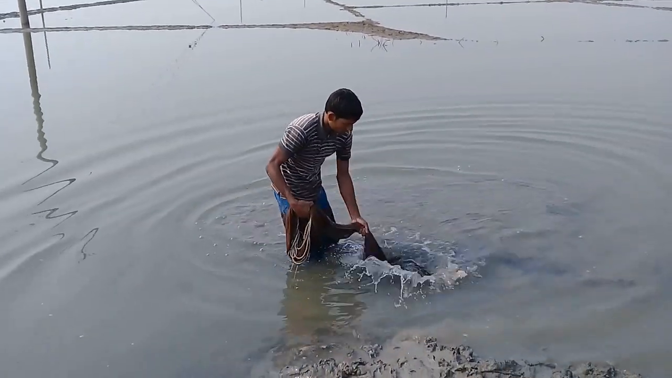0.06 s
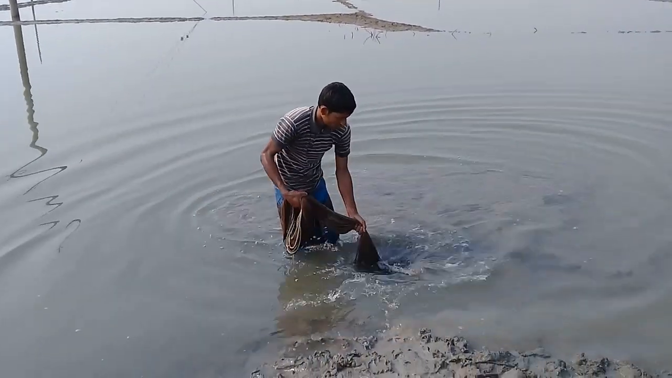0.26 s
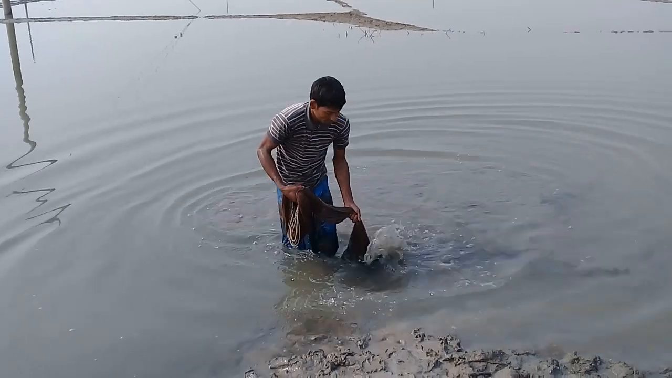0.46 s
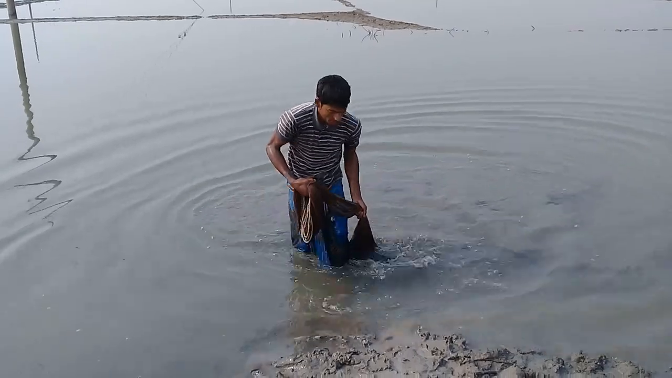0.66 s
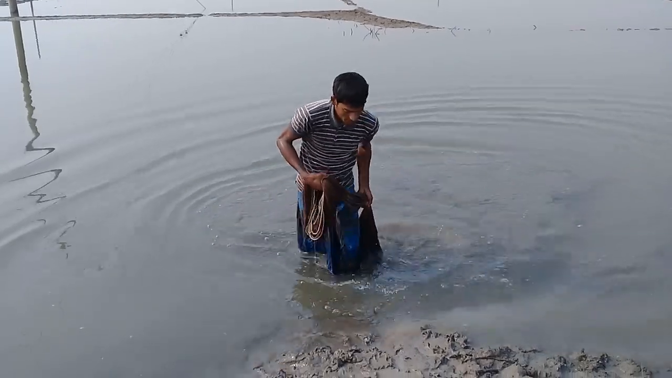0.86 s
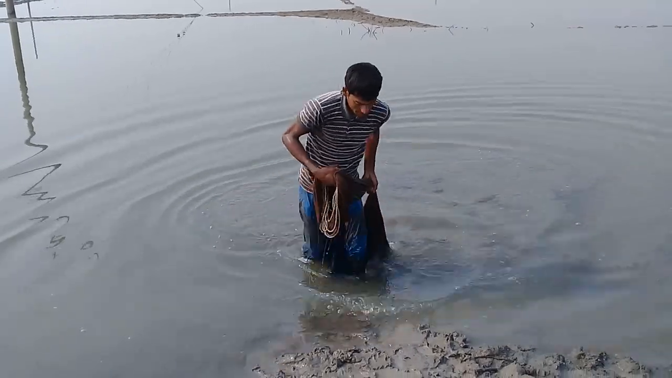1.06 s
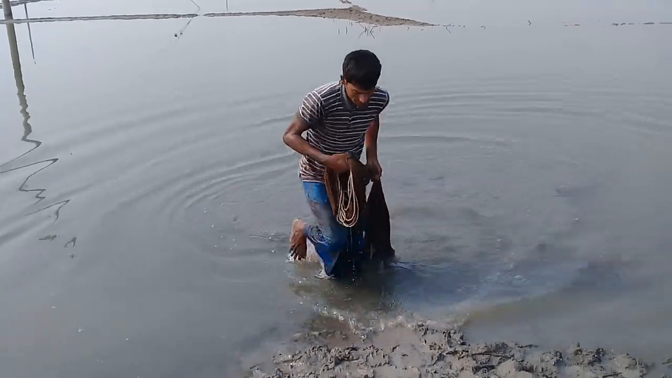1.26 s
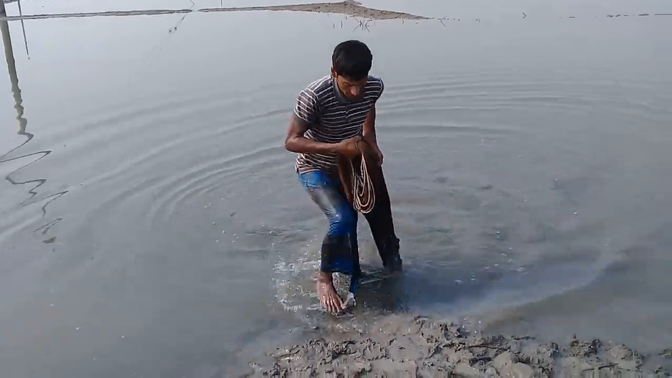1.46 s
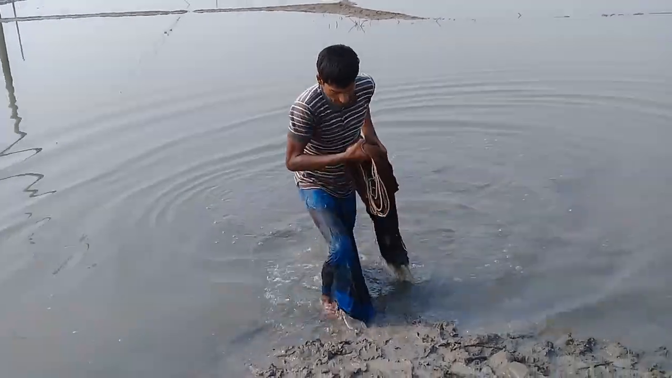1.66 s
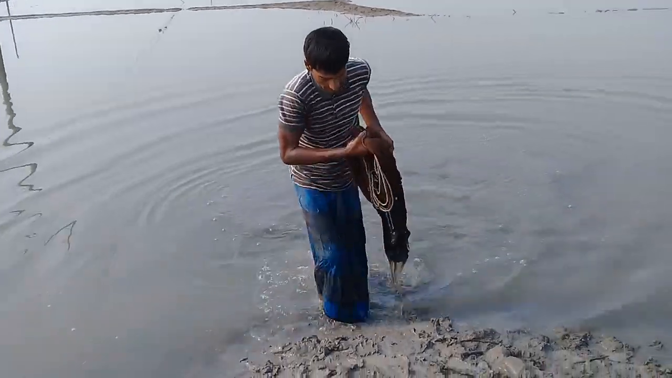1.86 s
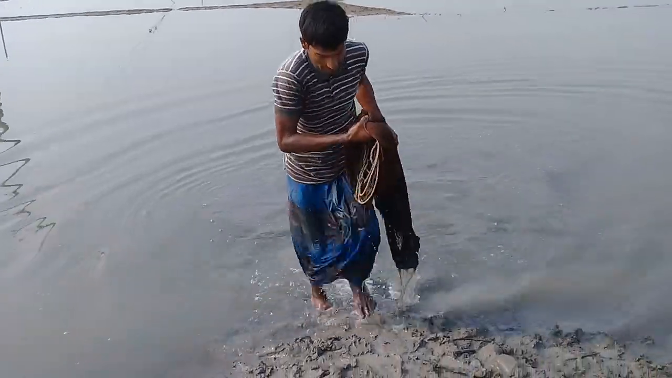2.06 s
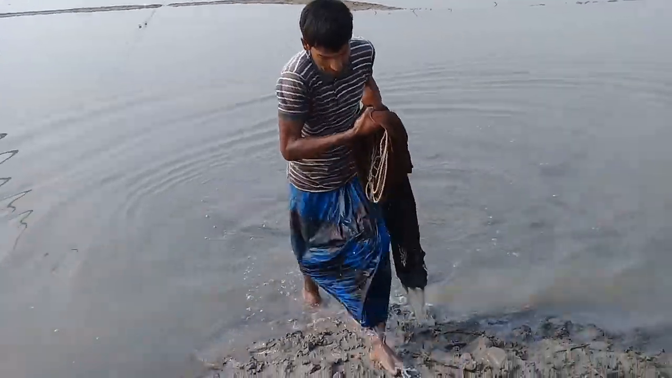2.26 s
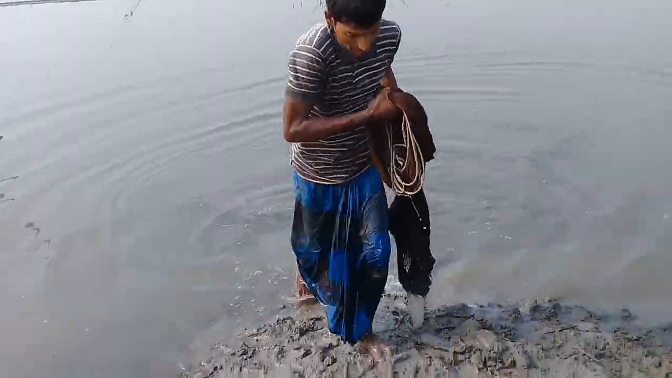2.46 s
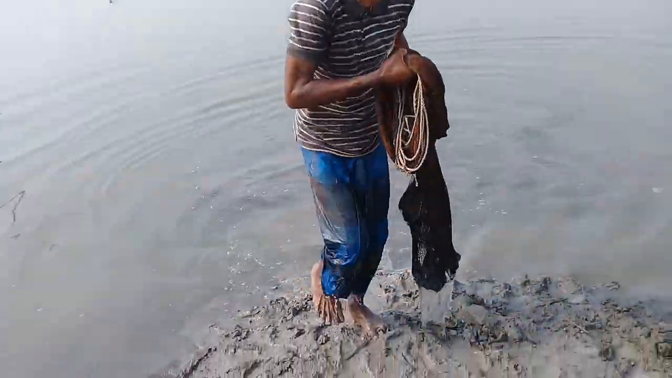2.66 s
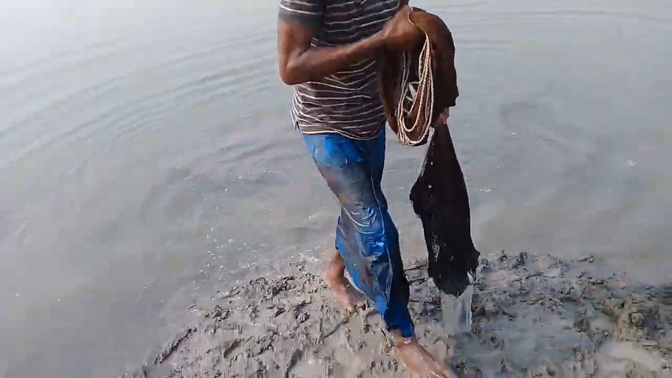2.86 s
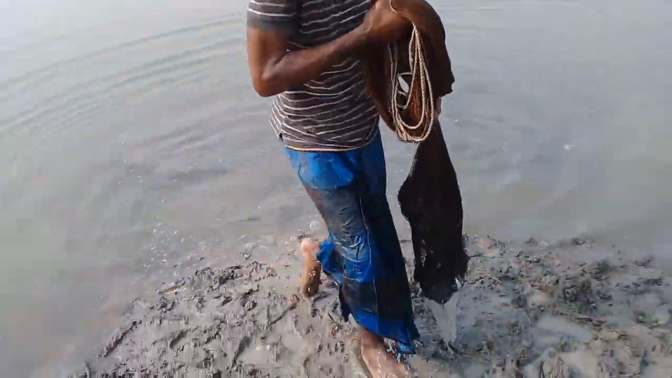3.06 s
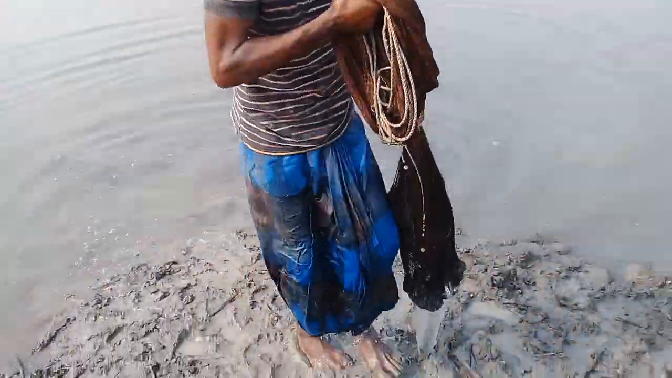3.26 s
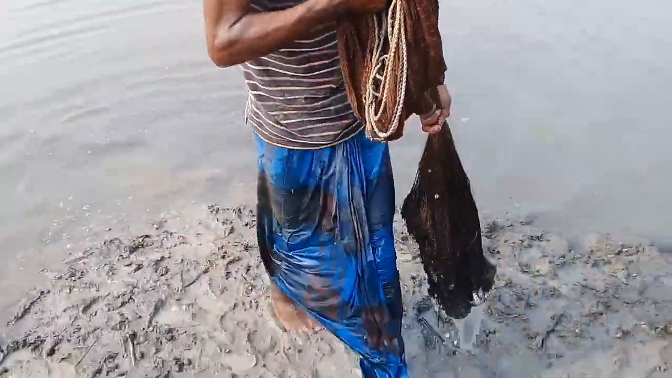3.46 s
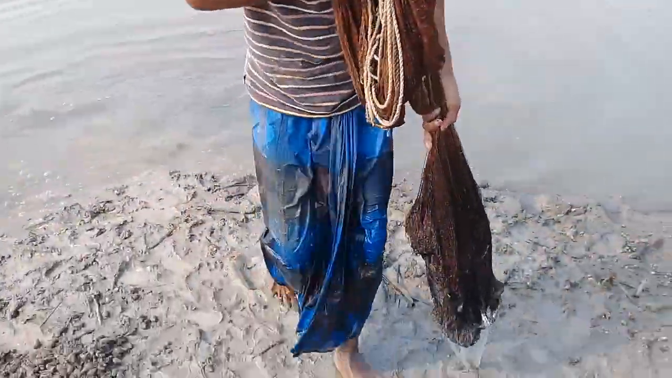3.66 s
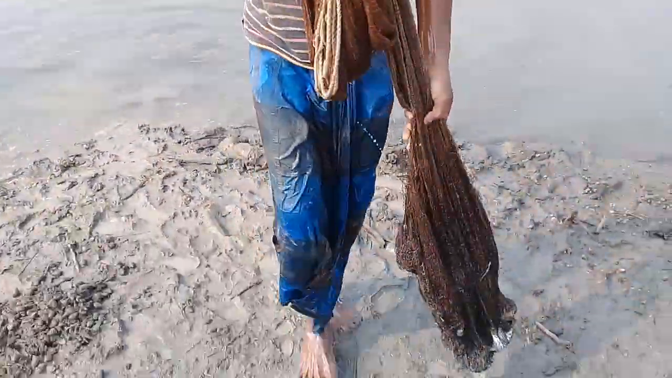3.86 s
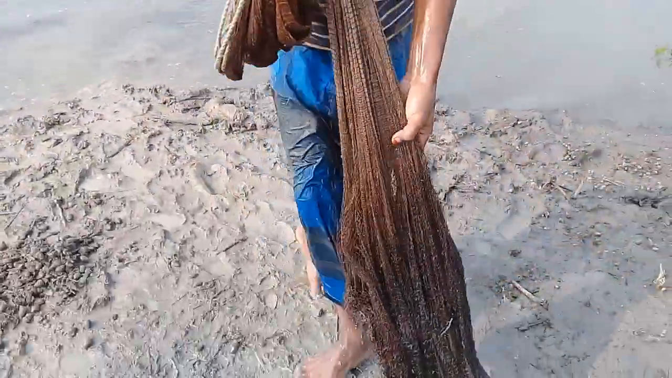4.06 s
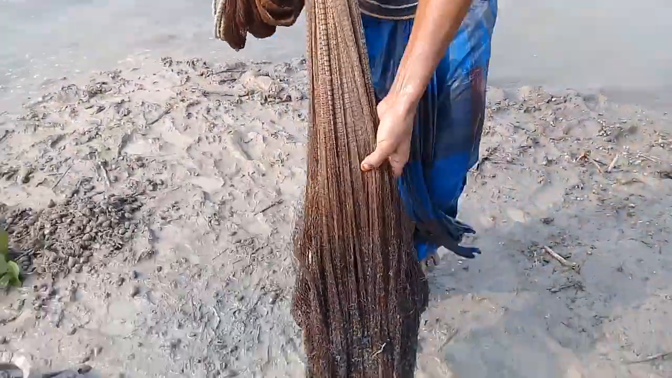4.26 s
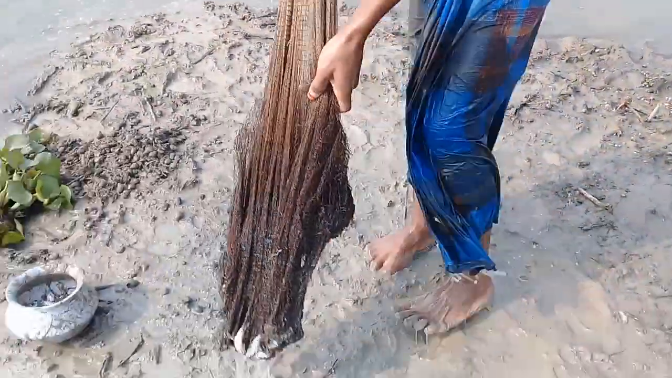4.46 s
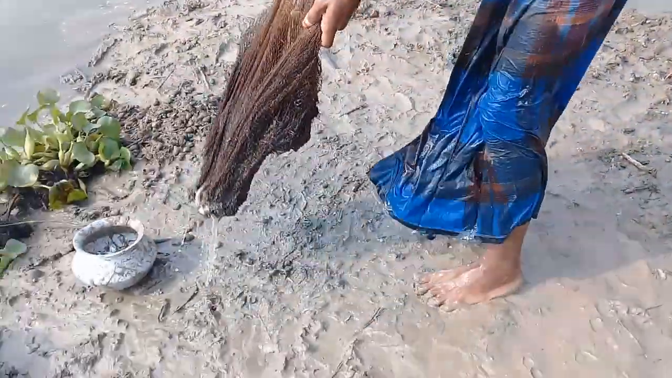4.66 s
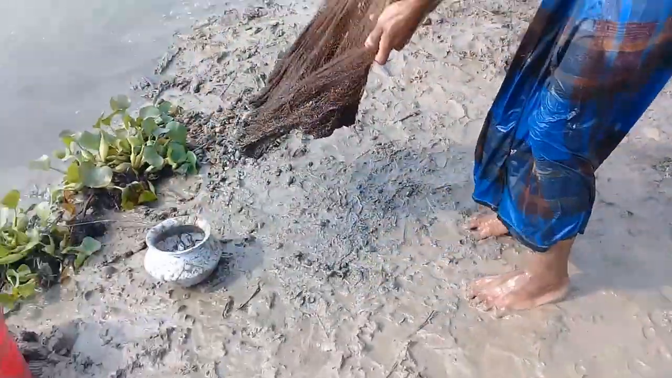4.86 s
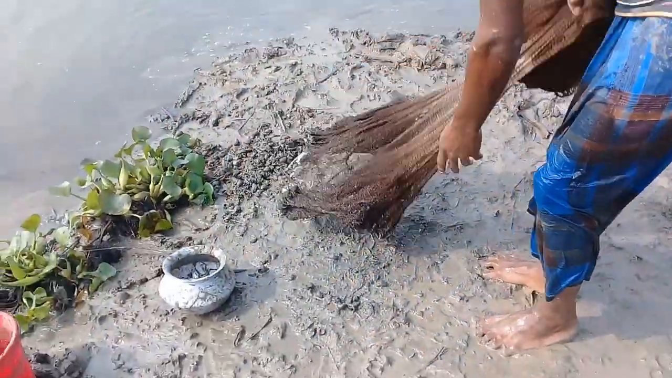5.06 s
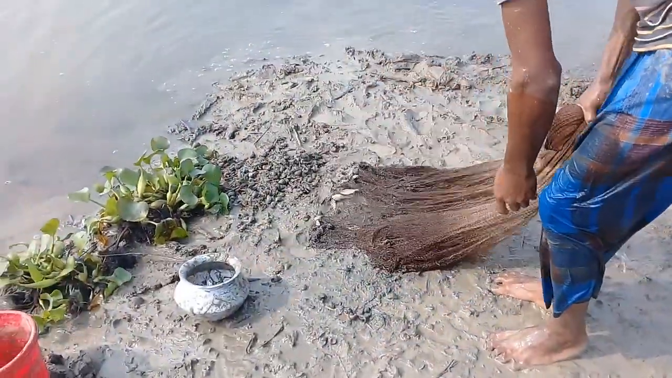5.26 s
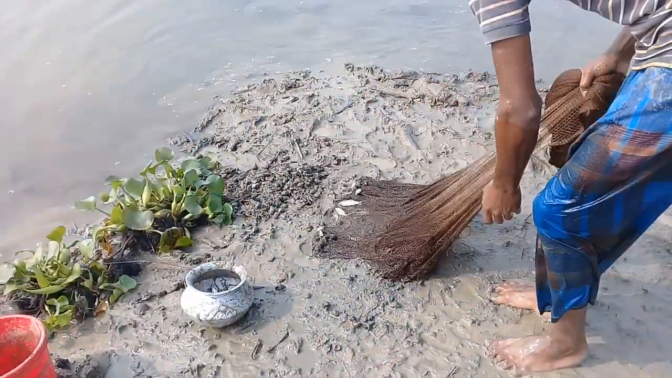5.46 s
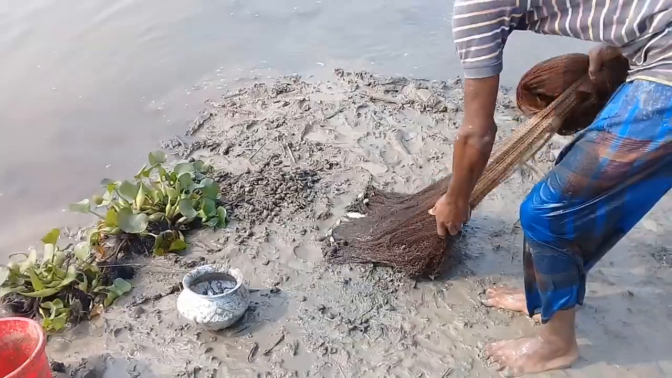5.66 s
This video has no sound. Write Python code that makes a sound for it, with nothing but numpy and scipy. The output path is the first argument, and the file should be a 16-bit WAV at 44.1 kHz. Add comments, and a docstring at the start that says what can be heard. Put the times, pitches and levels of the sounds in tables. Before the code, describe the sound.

Splashes and sloshing steps in shallow water, then a dripping net pattering on mud and a loud wet slap, over distant engine thudding.

```python
"""A fisherman wades out of a shallow river with a dripping cast net, crosses the mud and slaps the net down.
First come splashes, plops and sloshing round his legs, made of random clicks and short rising tones.
Run-off, made of tiny ticks and pings, patters on the river, then on the bank, among fat drops and mud smacks.
Last the strands swish and the heap lands, both made of filtered random clicks.
Two far diesel engines thud throughout; faint crickets, falling whistles, chirp for the first three seconds."""
import sys
import numpy as np
from scipy import signal
from scipy.fft import rfft, irfft, next_fast_len
from scipy.io import wavfile
from scipy.ndimage import map_coordinates

SR = 44100
rng = np.random.default_rng(int(sys.argv[2]) if len(sys.argv) > 2 else 0)


def output_pcm(signal):
    """Save a mono or channel-first signal as 16-bit PCM at the path in sys.argv[1].

    Samples are clipped to [-1, 1] before scaling.
    """
    pcm = np.clip(np.atleast_2d(signal).T, -1, 1) * 32767
    wavfile.write(sys.argv[1], SR, np.round(pcm).astype(np.int16))


N = 251797
TIME = np.arange(N) / SR
BRIEF = np.arange(SR // 8) / SR  # time axis of one short sound
TOP_HZ = 15750  # nothing is kept from this pitch upward
# how far the net is from the microphone: (time [s], distance [m])
NET_DISTANCE = [(1.3, 4.5), (2.7, 3.1), (4.0, 1.48)]


def amp(db):
    """Decibels to gain."""
    return 10 ** (np.asarray(db) / 20)


def unit(x):
    """Scale to an rms (average strength) of 1."""
    return x / np.sqrt(np.mean(x ** 2) + 1e-20)


def curves(rows):
    """One value per sample for each column after the time."""
    s, *cols = np.transpose(rows)
    return [np.interp(TIME, s, c) for c in cols]


def wobble(rate):
    """A smooth random curve through `rate` random points a second."""
    points = rng.standard_normal(int(N * rate / SR) + 4)
    return map_coordinates(points, [TIME * rate])


def swell(s, db, rise, t60, hold=0):
    """A gain that climbs until time s, holds, and dies away by 60 dB in t60 seconds."""
    climb = np.minimum((TIME - s) / rise, 0)
    decay = np.log(1000) * (s + hold - TIME) / t60
    return amp(db) * np.exp(np.minimum(climb, decay))


def together(gains):
    """Unrelated sounds add in power."""
    return np.sqrt(sum(gain ** 2 for gain in gains))


def add(track, s, sound):
    """Mix a sound into the track at time s."""
    start = max(round(s * SR), 0)
    part = track[start:start + len(sound)]
    part += sound[:len(part)]


def coloured(x, spectrum):
    """Shape the tone by (pitch [Hz], relative level [dB]) points, keeping the power of white noise."""
    size = 2 * next_fast_len(len(x) // 2 + 8192)
    hz, db = np.transpose(spectrum)
    log_pitch = np.log(np.fft.rfftfreq(size, 1 / SR) + 1)
    gain = unit(amp(np.interp(log_pitch, np.log(hz), db)))
    # folding the cepstrum makes the filter respond only after each sound, never before it
    cepstrum = irfft(np.log(gain + 1e-6))
    cepstrum[1:size // 2] *= 2
    cepstrum[size // 2 + 1:] = 0
    return irfft(rfft(x, size) * np.exp(rfft(cepstrum)))[:len(x)]


def burst(t60):
    """A short dying puff of noise."""
    return rng.standard_normal(len(BRIEF)) * np.exp(-np.log(1000) * BRIEF / t60)


def impacts(rate, spread_db):
    """Random clicks of uneven size, about `rate` a second, rms 1."""
    hit = rng.random(N) < rate / SR
    size = amp(spread_db * np.clip(rng.standard_normal(N), -2, 2))
    return unit(hit * size * rng.choice([-1, 1], N))


def bubble(hz, t60, rise, attack):
    """A pocket of air rings, its pitch climbing by the share `rise` in t60 seconds."""
    t = BRIEF[:int(t60 * SR) + 2]
    pitch = hz * (1 + rise * t / t60)
    tone = np.sin(2 * np.pi * np.cumsum(pitch) / SR)
    return tone * np.exp(-np.log(1000) * t / t60) * (1 - np.exp(-t / attack))


def bubbles(count, centre_hz, spread, cycles, rise, spread_db):
    """A swarm of bubbles at random moments round a steady or moving pitch, rms 1; high ones die sooner."""
    swarm = np.zeros(N)
    centre = centre_hz * np.ones(N)
    moments = (np.arange(count) + 2 * rng.random(count)) * N / SR / (count + 1)
    chances = 2 * (rng.random((count, 3)) - rng.random((count, 3)))
    for s, (pitch, life, size) in zip(moments, chances):
        hz = centre[int(s * SR)] * np.exp(spread * pitch)
        t60 = cycles * 2 ** (life / 2) / hz
        add(swarm, s, amp(spread_db * size) * bubble(hz, t60, rise, attack=1 / hz))
    return unit(swarm)


def droplets(count, t60, spread_db):
    """Scattered tiny ticks, each with a pitch, life and size of its own, rms 1."""
    chance = rng.random((count, 4))
    t = BRIEF[:SR // 200]
    start = chance[:, :1] * N
    hz = chance[:, 1:2] * TOP_HZ
    life = t60 * 10 ** (chance[:, 2:3] - .5)
    size = -np.log(chance[:, 3:] + 1 / 50)
    ticks = amp(spread_db * size) / np.sqrt(life) * np.sin(2 * np.pi * hz * t)
    ticks *= np.exp(-np.log(1000) * t / life)
    places = start.astype(int) + np.arange(len(t))
    return unit(np.bincount(places.ravel(), ticks.ravel(), N)[:N])


def engine(firing_hz, phase, exhaust, uneven_db, echo_db):
    """One exhaust thud per firing, and the same scatter from the banks after each."""
    # phase is the moment of the first firing, as a share of a cycle
    cycles = np.cumsum(firing_hz * np.ones(N)) / SR - phase
    fired = np.diff(np.floor(cycles), prepend=np.floor(-phase))
    pulses = fired * amp(uneven_db * rng.standard_normal(N))
    banks = burst(t60=0.17)
    echoes = signal.fftconvolve(pulses, banks / np.linalg.norm(banks))[:N]
    return unit(coloured(pulses + amp(echo_db) * echoes, exhaust))


def countryside():
    """Two slow diesel engines thud over the rumble and hush of open country, a gently wavering noise."""
    # tone of the nearer engine, the farther engine and the open air: (pitch [Hz], relative level [dB])
    near_tone = [(20, -37), (45, -34), (61, -1), (77, 8), (92, 2.5), (122, -1.5), (155, 0), (200, -10),
                 (260, -9), (400, -22.5), (800, -35), (2000, -86)]
    far_tone = [(40, -37), (95, -14.5), (140, 2), (260, -4), (400, -17), (800, -41), (2000, -64)]
    air_tone = [(20, -20.5), (45, -9.5), (70, -1), (130, 0.5), (260, -5.5), (400, -13), (700, -22.5),
                (1500, -28), (5000, -24.5), (9000, -45.5), (15000, -46.5)]
    near = amp(-51.5) * engine(15.3, phase=.26, exhaust=near_tone, uneven_db=2.5, echo_db=-6)
    far = amp(-59) * engine(23.5, phase=0.501, exhaust=far_tone, uneven_db=0.8, echo_db=9.5)
    air = unit(coloured(rng.standard_normal(N), air_tone))
    return near + far + amp(-51.5 + 1.87 * wobble(3.085)) * air


def crickets():
    """Each wing stroke is a falling whistle; a chirp of strokes grows towards its end."""
    # one cricket a row: (first chirp [s], chirp spacing [s], chirp count, pitch [Hz], mid-chirp level [dB])
    singers = [(-.062, .1792, 17, 6750, -58), (.175, .215, 3, 7450, -60)]
    strokes_hz, chirp_s, glide = 92, .119, .2  # glide is the fall in pitch as a share
    song = np.zeros(N)
    for first, spacing, count, hz, db in singers:
        chirp, age = np.divmod(TIME - first, spacing)
        stroke = age * strokes_hz % 1
        singing = (chirp >= 0) & (chirp < count) & (age < chirp_s)
        pitch = hz * (1 + glide * (.5 - stroke))
        whistle = np.sin(2 * np.pi * np.cumsum(pitch) / SR)
        growth_db = 7.8 * (age / chirp_s - .5)
        song += singing * amp(db + growth_db) * np.sin(np.pi * stroke) ** 4 * whistle
    return song


def sloshing():
    """Legs and net churn bubbles into the water; shallower water makes them smaller and weaker."""
    # pushes through river, then puddled mud: (time [s], level before the mix below [dB], hold [s])
    strides = [(0, -48, 0.091), (0.465, -50, 0.24), (1.376, -42, .15), (1.743, -48, 0.203),
               (2.08, -44, 0.097), (2.657, -45.5, 0.17), (3.33, -56, 0.19), (3.77, -52.5, 0.19),
               (4.24, -56.5, 0.029), (4.672, -62, 0.14), (5.626, -58.5, 0.069)]
    # tone of the churned water: (pitch [Hz], relative level [dB])
    churn_tone = [(250, -27), (500, -4), (900, 5), (1350, 3.5), (1650, -10), (2000, 12.5), (2500, -27),
                  (5000, -32)]
    rise_s, t60_s = 0.11, 0.87  # water is set moving quickly and settles slowly
    stir = together(swell(s, db, rise_s, t60_s, hold) for s, db, hold in strides)
    depth = np.interp(TIME, [2.1, 2.7], [1, 0])  # 1 in the river, 0 ashore
    gurgle = bubbles(count=1600, centre_hz=1800 - 530 * depth, spread=0.439, cycles=29.5, rise=0.31, spread_db=5.5)
    churn = coloured(impacts(rate=1200, spread_db=10.5), churn_tone)
    return stir * (amp(-8 + 2 * depth) * gurgle + amp(-8.5) * churn)


def plops():
    """Single bubbles close behind the legs; the lower, larger ones ring longer."""
    # bubbles that stand out: (time [s], level before a 1 dB lift [dB], pitch [Hz])
    plop_list = [(.355, -35.5, 2010), (.379, -36, 1910), (.484, -35, 1890), (.624, -48, 540),
                 (.637, -42, 1900), (.719, -41, 964), (0.728, -36.5, 1080), (.881, -44, 1304),
                 (0.985, -41.5, 1730), (1.004, -46, 1096), (1.110, -34.5, 1244), (1.114, -41, 2000),
                 (1.12, -52, 2600), (1.171, -45, 5240), (1.345, -36, 870), (1.713, -42.5, 610),
                 (1.762, -38.5, 957), (1.824, -38.5, 970), (1.848, -43, 780), (1.888, -42, 826),
                 (2.095, -42, 1000), (2.258, -36.5, 1490), (2.3, -37, 1460), (2.598, -35.5, 1840)]
    track = np.zeros(N)
    for s, db, hz in plop_list:
        khz = hz / 1000
        t60 = 0.056 / khz ** 0.59
        add(track, s, amp(db + 1.0) * bubble(hz, t60, rise=0.42, attack=0.00014))
    return track


def splashes():
    """Each splash swells raggedly as water is struck, traps small bubbles and dies as the spray falls back."""
    # net and feet in river and puddled mud: (crest time [s], level before the mix below [dB], rise [s], t60 [s])
    splash_list = [(.065, -32.5, 0.0061, 0.067), (0.082, -30, 0.0022, .032), (0.142, -26, 0.011, 0.04),
                   (.382, -41.5, .003, 0.238), (.748, -38, 0.00093, 0.0585), (0.778, -42, 0.0044, .053),
                   (0.806, -43, .002, 0.078), (1.33, -48, 0.0046, .18), (1.436, -42.5, 0.0034, 0.11),
                   (1.635, -38.5, 0.00184, 0.11), (1.981, -42, 0.0016, 0.15), (2.255, -44, .004, .06),
                   (2.296, -41, .005, 0.094), (2.456, -45, 0.0058, 0.045), (3.425, -44.5, 0.043, 0.32),
                   (3.839, -47, 0.015, .23), (3.934, -44, 0.018, 0.21)]
    # tone of the spatter: (pitch [Hz], relative level [dB])
    spatter_tone = [(180, -43), (300, -13), (468, -10), (631, 0), (1020, -3), (1370, -4), (1620, -15),
                    (1940, 5.5), (2320, -4.5), (5660, -6.5), (6790, -24), (9290, -24.5), (15500, -40)]
    strength = sum(swell(s, db, rise, t60) for s, db, rise, t60 in splash_list)
    spatter = coloured(impacts(rate=3500, spread_db=4.5), spatter_tone)
    froth = bubbles(count=3200, centre_hz=1990, spread=0.526, cycles=17, rise=0.083, spread_db=4.5)
    return strength * amp(4.18 * wobble(200)) * (amp(-1.0) * spatter + amp(-6) * froth)


def flow():
    """Gains of patter and spray: an even stream from the lifted net that runs dry, and a shower at every jolt."""
    # each jolt of the net sheds a shower; levels before run_off mixes them:
    # (time [s], patter level [dB], fine spray level [dB], hold [s])
    jolts = [(0, -48, -64, 0.16), (0.359, -49, -61.5, 0.079), (0.795, -50.5, -65.5, 0.026),
             (1.336, -52.5, -78, 0.021), (1.474, -52, -63, .02), (1.63, -48, -60, 0.012),
             (2.175, -49, -63, 0.075), (2.314, -50, -55, 0.014), (2.4, -43.5, -56.5, 0.015),
             (2.962, -72, -60.5, .07), (3.23, -56, -59, .01), (3.571, -46.5, -52, 0.011),
             (3.78, -45, -58, 0.054), (4.1, -50.5, -57, 0.071), (4.286, -67, -56, 0.044),
             (4.644, -51, -61, 0.064), (4.798, -55.5, -66, 0.036), (5.427, -58.5, -61, 0.037),
             (5.605, -54.5, -73, 0.065)]
    jolt_rise_s, jolt_t60_s = 0.047, 0.46  # every shower builds and thins alike
    metres, = curves(NET_DISTANCE)
    stream = swell(1.46, db=-41.5, rise=0.19, t60=10.4, hold=1.05) / metres
    # spray fades faster with distance than patter: 5 dB more per metre
    patter, spray = [stream], [stream * amp(0.5 - 5 * metres)]
    for s, patter_db, spray_db, hold in jolts:
        patter.append(swell(s, patter_db, jolt_rise_s, jolt_t60_s, hold))
        spray.append(swell(s, spray_db, jolt_rise_s, jolt_t60_s, hold))
    return together(patter), together(spray)


def run_off():
    """Water streams from the mesh in clumps of droplets; some ping, some shatter into spray."""
    # tone of drops on the river, drops on the mud and fine spray: (pitch [Hz], relative level [dB])
    river_tone = [(240, -36), (400, -19), (520, -18), (605, -17), (739, -29), (892, -9.5), (1370, 5),
                  (1570, -1.5), (1990, 3.5), (2930, -6), (5160, 2), (8000, -17.5), (10400, -49),
                  (17600, -120)]
    mud_tone = [(350, -72), (600, -38), (966, -44), (1200, -12.5), (1630, -17), (1780, -12), (2130, -9.5),
                (2620, -5.5), (4070, -7), (5280, -1.5), (6550, -12.5), (9000, -19.5), (11700, -57),
                (19800, -120)]
    spray_tone = [(4000, -67), (6500, -3), (8000, -5.5), (10000, -0.5), (12000, -7.5), (15000, -11)]
    patter_gain, spray_gain = flow()
    ashore = np.clip((TIME - 2.3) / 1.27, 0, 1)
    ticks = droplets(count=18000, t60=0.01, spread_db=4.0)
    # deep water traps larger bubbles than the thin film on the mud
    plinks = bubbles(count=900, centre_hz=2697, spread=0.291, cycles=105, rise=0.29, spread_db=-1.5)
    pings = bubbles(count=750, centre_hz=4315, spread=0.32, cycles=156, rise=0.16, spread_db=-0.5)
    river = amp(-1.5) * coloured(ticks, river_tone) + amp(-4.5) * plinks
    mud = coloured(ticks, mud_tone) + amp(-9.5) * pings
    patter = np.sqrt(1 - ashore) * river + np.sqrt(ashore) * mud
    spray = coloured(droplets(count=12000, t60=0.0033, spread_db=-4.0), spray_tone)
    clumps = amp(2.1 * wobble(50))
    return clumps * (patter_gain * patter + amp(-4.5) * spray_gain * spray)


def drops():
    """A fat drop cracks on the wet mud and rings a tiny air pocket."""
    # the fattest drops: (time [s], level before the crack and ring trims [dB], pitch [Hz])
    drop_list = [(2.332, -30, 2700), (2.689, -28.5, 5300), (2.784, -31.5, 3450), (2.8524, -26.5, 3320),
                 (2.9484, -30, 5030), (3.1817, -35, 4960), (3.273, -28.5, 4080), (3.301, -29, 4390),
                 (3.5778, -25, 5000), (3.6723, -30.5, 3550), (3.716, -32, 5040), (3.7493, -25.5, 5110),
                 (3.8122, -30.5, 4550), (4.0122, -30, 5330), (4.1218, -29.5, 3880), (4.143, -23, 5505),
                 (4.3172, -32.5, 2630), (4.3324, -34.5, 4150), (4.4256, -28, 3740), (4.5127, -32, 4570),
                 (4.642, -34, 2500), (4.8713, -33, 4600), (4.9633, -32.5, 5280), (5.439, -33, 5320)]
    crack_tone = [(400, -14), (1500, -15), (3000, -0.5), (5500, 12.0), (7000, 2), (10000, -7), (15000, -25)]
    track = np.zeros(N)
    for s, db, hz in drop_list:
        crack = coloured(burst(t60=0.02), crack_tone)
        ring = bubble(hz, t60=0.016, rise=0.047, attack=0.00047)
        add(track, s, amp(db - 8.5) * crack)
        add(track, s, amp(db - 1.5) * ring)
    return track


def smacks():
    """Mud spits round a closing cavity while the weight thuds beneath."""
    # feet and sinkers hit mud: (time [s], level before the part trims [dB], pitch [Hz], thud against level [dB])
    smack_list = [(3.279, -28, 1690, -24), (3.381, -30.5, 2110, -12.5), (3.422, -26.5, 4580, -11.5),
                  (3.461, -32, 2340, -23), (3.4927, -22, 1860, -37), (3.5508, -24, 4580, -16),
                  (3.845, -27, 2710, -39), (3.936, -29.5, 2450, -12), (3.955, -35.5, 1360, -3.5),
                  (4.608, -35, 4030, -13.5), (4.688, -31, 2300, -6), (5.250, -24, 1790, -25),
                  (5.278, -9.5, 2800, -35), (5.334, -22, 5300, -39)]
    spit_tone = [(400, -37.0), (1300, 3.0), (3000, 3.5), (5500, 4.5), (9000, -11), (15000, -45)]
    thud_tone = [(100, -1), (400, -3.0), (1000, -6.0), (1600, -11), (4000, -31)]
    track = np.zeros(N)
    for s, db, hz, thud_db in smack_list:
        spit = coloured(burst(t60=0.023), spit_tone)
        thud = coloured(burst(t60=0.04), thud_tone)
        cavity = bubble(hz, t60=0.01544, rise=0.077, attack=0.00012)
        add(track, s, amp(db) * (amp(-7.5) * spit + amp(thud_db) * thud))
        add(track, s, amp(db - 3.5) * cavity)
    return track


def swish():
    """Wet strands slide over one another as the net is swung: a rush of filtered clicks."""
    # tone of the rubbing strands: (pitch [Hz], relative level [dB])
    strand_tone = [(1200, -49), (1900, -7), (2400, 9), (3600, -3), (5000, -24), (10000, -20), (15000, -19)]
    swing = swell(4.813, db=-59.5, rise=0.096, t60=0.97, hold=.2)
    return swing * coloured(impacts(rate=12000, spread_db=9), strand_tone)


def landing():
    """The heap of soaked mesh slaps the mud in a dense rush of clicks, then the spray falls back."""
    # tone of the wet mesh: (pitch [Hz], relative level [dB])
    mesh_tone = [(180, -34), (300, -15), (580, -23), (950, -14.5), (1350, -0.5), (1560, -14), (1850, 4.5),
                 (2200, -6), (2750, 4), (3700, 1), (5700, 2), (6800, -6.5), (8000, -2), (15500, -28)]
    touch_s, full_weight_s, fallback_s = 5.256, 5.279, 5.367
    heap = (TIME > touch_s) * swell(full_weight_s, db=-19, rise=0.027, t60=0.061, hold=0.035)
    fallback = swell(fallback_s, db=-37.5, rise=.013, t60=.13)
    return together([heap, fallback]) * coloured(impacts(rate=11000, spread_db=5.0), mesh_tone)


def scene():
    """All the water sounds over the distant life; the bank scatters more of the farther ones."""
    water = sloshing() + plops() + splashes() + run_off() + drops() + smacks() + swish() + landing()
    metres, = curves(NET_DISTANCE)
    bank = burst(t60=0.2)
    scatter = signal.fftconvolve(amp(-20) * metres * water, bank / np.linalg.norm(bank))[:N]
    return (countryside() + crickets() + water + scatter)[None]


def record(dry):
    """The recorder keeps nothing above its band limit."""
    size = next_fast_len(N + SR // 4)
    kept = np.fft.rfftfreq(size, 1 / SR) < TOP_HZ
    return irfft(rfft(dry, size) * kept, size)[:, :N]


dry = scene()
out = record(dry)
output_pcm(out)
```